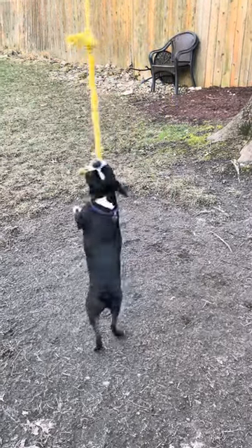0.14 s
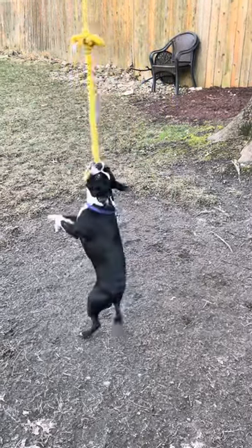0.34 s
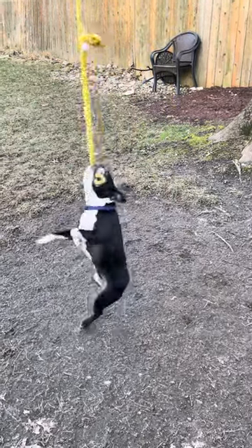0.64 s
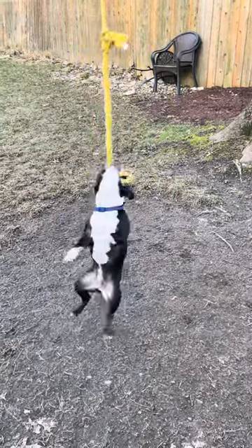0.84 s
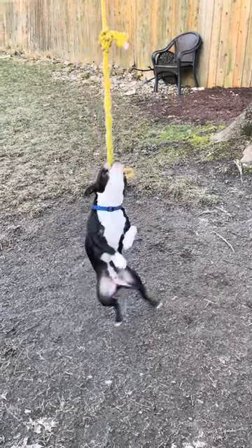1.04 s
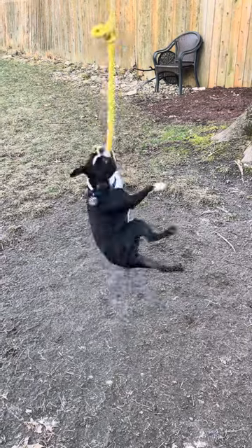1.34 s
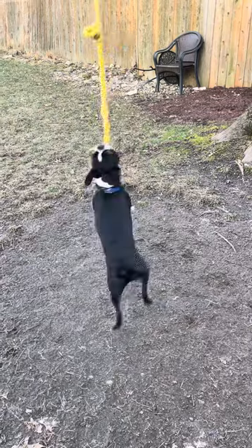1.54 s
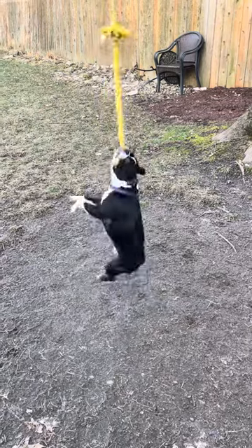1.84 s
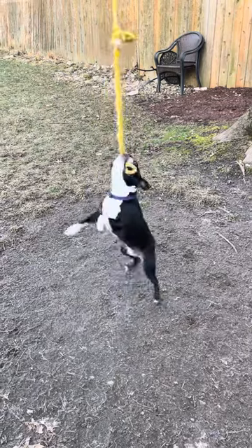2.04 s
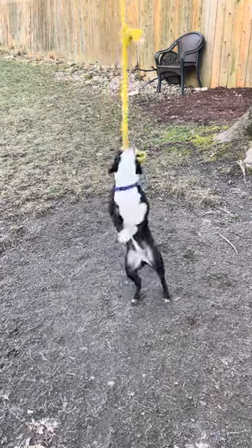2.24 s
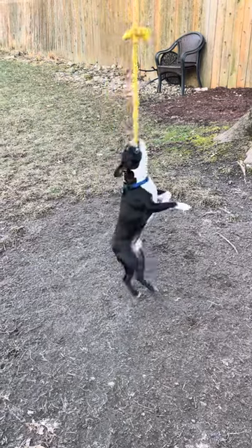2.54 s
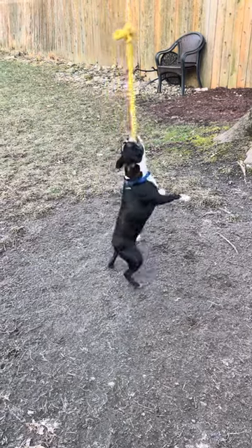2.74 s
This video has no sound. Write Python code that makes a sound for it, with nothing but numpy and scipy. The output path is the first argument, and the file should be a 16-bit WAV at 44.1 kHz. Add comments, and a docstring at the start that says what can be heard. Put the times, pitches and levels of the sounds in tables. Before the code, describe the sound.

A dog gripping a rope gives two throaty, raspy growls, with sharp jaw and rope snaps around the first's end, then a brief whine and faint dirt scuffs; quiet backyard, stereo microphone at moderate distance.

```python
"""In a quiet backyard a dog hangs from a rope and growls twice through its clenched teeth.
Each growl starts as a pitched tone and breaks into a rasp: regular and irregular beats filtered by a throat.
Both throb on a throat resonance, and the second clears into a whine of regular beats.
Jaws and rope snap and paws scuff the dirt, all shaped noise reaching two microphones with a faint echo.
A low, wavering sine hum and filtered noise lie under it all."""
import sys
import numpy as np
from scipy import signal
from scipy.fft import rfft, irfft, next_fast_len
from scipy.io import wavfile
from scipy.ndimage import uniform_filter1d, map_coordinates

SR = 44100
rng = np.random.default_rng(int(sys.argv[2]) if len(sys.argv) > 2 else 0)


def dump_mix(stems):
    """Bounce the given channels to the path in sys.argv[1] as a 16-bit WAV at rate SR."""
    frames = np.atleast_2d(stems).T  # one column per channel
    limited = np.clip(frames, -1, 1)  # hard clip at full scale
    pcm = np.round(limited * 32767).astype(np.int16)
    wavfile.write(sys.argv[1], SR, pcm)


N = 127890  # samples, 2.9 s

# hollow colour of jaw knocks and of the body of a scuff: hz [Hz], level_db [dB, relative]
KNOCK_COLOUR = [(150, -9.5), (650, -4), (1400, 2), (2000, 0), (2500, -16.5), (5000, -53)]
# bright colour of cracks and of dirt grit: hz [Hz], level_db [dB, relative]
CRACK_COLOUR = [(1500, -25), (3200, 6), (7000, -1.5), (9000, 8.5), (10800, 4.5), (15500, -54.5)]


def amp(db):
    """Decibels to gain."""
    return 10 ** (np.asarray(db) / 20)


def unit(x):
    """Scale to rms 1."""
    return x / np.sqrt(np.mean(x ** 2) + 1e-20)


def steady(x, size=900):
    """Hold the short-term rms near 1, judged over windows of size samples."""
    power = uniform_filter1d(uniform_filter1d(x * x, size), size)
    return x / np.sqrt(np.abs(power) + 1e-14)


def along(points, hz):
    """Read (Hz, value) points on a log frequency axis."""
    f, v = np.transpose(points)
    return np.interp(np.log(hz + 1), np.log(f + 1), v)


def curves(rows):
    """One value per sample for each column after the time."""
    s, *cols = np.transpose(rows)
    return [np.interp(np.arange(N) / SR, s, c) for c in cols]


def gate(rows, fade_s=0.0069):
    """Fully open from the first row to the last, with a short fade outside each end."""
    t = np.arange(N) / SR
    inside_s = np.minimum(t - rows[0][0], rows[-1][0] - t)
    return np.clip(inside_s / fade_s + 1, 0, 1)


def wobble(rate):
    """A smooth random curve, rate knots a second."""
    knots = rng.standard_normal(int(N * rate / SR) + 4)
    return map_coordinates(knots, [np.arange(N) * rate / SR])


def filtered(x, response):
    """Multiply the spectrum of x by a response of frequency."""
    m = 2 * next_fast_len(N)
    return irfft(rfft(x, m) * response(np.fft.rfftfreq(m, 1 / SR)), m)[..., :N]


def coloured(x, points, band=lambda hz: 1):
    """Causal (minimum-phase) filter with the given (Hz, dB) shape, within a band."""
    def response(hz):
        size = np.maximum(amp(along(points, hz)) * band(hz), 1e-6)
        cepstrum = irfft(np.log(size))
        # folding the cepstrum forward in time makes the filter causal
        half = len(cepstrum) // 2
        cepstrum[1:half] *= 2
        cepstrum[half + 1:] = 0
        return np.exp(rfft(cepstrum))
    return filtered(x, response)


def gliding(x, scale, points, band):
    """Filter in warped time, so that resonances and band edges move in proportion to scale."""
    clock, n = np.cumsum(scale), np.arange(N)
    warped = map_coordinates(x, [np.interp(n, clock, n)])
    return map_coordinates(coloured(warped, points, band), [clock])


def beats(hz):
    """Sample positions at which a cycle completes."""
    turns = np.cumsum(hz) / SR
    return np.interp(np.arange(1, int(turns[-1])), turns, np.arange(N))


def pulses(at, scatter_db, order=8):
    """Band-limited clicks of random size at fractional sample positions."""
    k = at.astype(int)[:, None] + np.arange(1 - order, order + 1)
    d = k - at[:, None]
    size = amp(scatter_db * np.clip(rng.standard_normal((len(at), 1)), -2, 2))
    clicks = size * np.sinc(d) * np.sinc(d / order)  # windowed sinc
    return np.bincount(np.clip(k, 0, N - 1).ravel(), clicks.ravel(), N)


def growl(effort, bright, throat, low_hz=1300, high_hz=4300):
    """Regular and irregular beats of the folds share one throat; the muzzle resonances rise as the lips part."""
    level_db, = curves(effort)
    mids_db, treble_db = curves(bright)
    age_s = np.maximum(np.arange(N) / SR - effort[0][0], 0)
    pitch_hz, rough = folds(age_s)
    source = fold_source(pitch_hz, rough)

    def below(hz, edge_hz):
        """Pass what lies under an edge."""
        return 1 / (1 + (hz / edge_hz) ** 12)

    low = steady(coloured(source, throat, lambda hz: below(hz, low_hz)), size=600)
    sag, open_s = 0.32, 0.18  # the middle band starts this share low and rises over this time
    muzzle = 1 - sag * np.clip(1 - age_s / open_s, 0, 1)
    mid = steady(gliding(source, muzzle, throat, lambda hz: (1 - below(hz, low_hz)) * below(hz, high_hz)))
    spit_db = 3.5  # extra size spread of the treble when the voice is rough
    spitting = source * amp(spit_db * rough * wobble(410))
    top = steady(coloured(spitting, throat, lambda hz: 1 - below(hz, high_hz)), size=2200)

    tone, hold = throbs()
    flutter_db, duck_db = 2.92, -4  # greatest tremor of the rough voice; dip of the low band under a throb
    tremor = amp(flutter_db * rough * np.tanh(wobble(70)))
    lower = amp(level_db + duck_db * hold) * low
    upper = gate(bright) * (amp(mids_db) * mid + amp(treble_db) * top)
    return gate(effort) * (tone + tremor * (lower + upper))


def folds(age_s):
    """Pitch, and the share of rasp, which drops away while the folds beat regularly."""
    # spells of regular beating: start_s [s], end_s [s], first_pitch_hz [Hz], last_pitch_hz [Hz]
    spells = [(0.211, 0.246, 321.4, 413.4), (0.262, 0.292, 406, 434.2), (0.298, 0.328, 444.3, 474),
              (0.343, 0.375, 441, 463), (1.021, 1.045, 434, 461.4), (1.079, 1.106, 472.7, 507.7),
              (1.723, 1.751, 278.6, 405.4), (1.754, 1.785, 414.5, 475.4), (1.797, 1.82, 411, 451),
              (1.847, 1.869, 412.6, 440)]
    switch_s = 0.0062  # time to change between regular and irregular beating
    fray = 0.1  # rasp share added one second into a growl, growing with age squared
    pitch_hz, = curves([point for a, b, first, last in spells for point in ((a, first), (b, last))])
    t = np.arange(N) / SR
    regular = sum(np.clip(np.minimum(t - a, b - t) / switch_s + .5, 0, 1) for a, b, *_ in spells)
    return pitch_hz, np.clip(1 - regular + fray * age_s ** 2, 0, 1)


def fold_source(pitch_hz, rough):
    """Even clicks of regular folds cross over to a rasp of scattered clicks and rushing air."""
    fold_jitter, rasp_jitter = 0.01515, .16  # spread of the beat rate, natural log
    rasp_hz, scatter_db = 314.7, 4.5  # central rate and size spread of the irregular beats
    air = 0.42  # share of the rasp's power that is rushing air
    clean = pulses(beats(pitch_hz * np.exp(fold_jitter * wobble(200))), 0)
    tearing = steady(pulses(beats(rasp_hz * np.exp(rasp_jitter * wobble(330))), scatter_db))
    rasp = np.sqrt(1 - air) * tearing + np.sqrt(air) * rng.standard_normal(N)
    return np.sqrt(1 - rough) * unit(clean) + np.sqrt(rough) * rasp


def throbs(waver=0.02544):
    """The folds lock onto the throat's resonance in short swells: the tone, and how firmly it holds (0-1)."""
    # swells of the locked voice: centre_s [s], length_s [s], pitch_hz [Hz], level_db [dB]
    swell_rows = [(.547, 0.023, 625, -18), (.586, 0.029, 592.4, -19.5), (0.619, 0.027, 673, -20),
                  (0.664, 0.05, 632.3, -19), (.713, 0.037, 614.5, -20), (0.791, 0.012, 575.6, -23),
                  (0.845, .024, 626, -23.5), (1.05, 0.011, 580, -22.5), (1.071, 0.0087, 577.7, -21),
                  (1.113, 0.0054, 582.8, -25), (1.836, 0.0098, 595.4, -26.5), (1.879, 0.028, 579, -30),
                  (1.926, 0.035, 621, -27)]
    beat, octave_db = 0.15, -18.5  # depth of a pattern repeating every third cycle; overtone level
    t = np.arange(N) / SR
    swells = [np.exp(-(2 * (t - s) / length) ** 4) for s, length, _, _ in swell_rows]
    _, hz, _ = curves(swell_rows)
    phase = 2 * np.pi * np.cumsum(hz * (1 + waver * wobble(200))) / SR
    pulsing = 1 + beat * (np.cos(phase / 3) + np.sin(2 * phase / 3))
    tone = unit(np.sin(phase) * pulsing + amp(octave_db) * np.sin(2 * phase))
    loudness = sum(amp(row[-1]) * swell for row, swell in zip(swell_rows, swells))
    return tone * loudness, np.minimum(sum(swells), 1)


def whine(jitter=0.0017):
    """The folds settle into a clean note that rises, then drops as it fades."""
    # course of the whine: time_s [s], pitch_hz [Hz], level_db [dB]
    course = [(2.462, 389, -35.5), (2.508, 400, -25.5), (2.58, 410.4, -28), (2.637, 457.3, -32),
              (2.656, 430, -35), (2.675, 379, -60)]
    # throat and muzzle during the whine: hz [Hz], level_db [dB, relative]
    whine_throat = [(150, -40), (400, 1.5), (810, -1.5), (900, -19.5), (1200, -29.5), (1360, -12.5),
                    (1600, -26), (1800, -5.5), (2030, -6.5), (2200, -29), (3100, -19), (3700, -37),
                    (4300, -23.5), (4850, -45), (5200, -23), (6200, -24), (8800, -46), (10200, -23.5),
                    (11500, -66.5)]
    pitch_hz, level_db = curves(course)
    source = pulses(beats(pitch_hz * np.exp(jitter * wobble(150))), 0)
    return gate(course) * amp(level_db) * steady(coloured(source, whine_throat))


def snaps(attack_s=0.00081, tail_db=-16, tail_t60_s=0.23):
    """Jaws and rope snap: each a hollow noise knock with a short tail and a bright noise crack."""
    # the snaps: start_s [s], knock_db [dB], crack_db [dB], t60_s [s to fall by 60 dB]
    snap_rows = [(.232, -49, -30, 0.031), (0.828, -26, -42, .07), (1.118, -25, -42, 0.074),
                 (1.133, -57, -24, 0.034), (1.238, -34, -41.5, 0.042), (1.259, -37.5, -32.5, 0.036),
                 (1.719, -68, -36, 0.05)]
    knock, crack = np.zeros((2, N))
    for s, knock_db, crack_db, t60_s in snap_rows:
        t = np.maximum(np.arange(N) / SR - s, 0)
        rise = 1 - np.exp(-t / attack_s)
        shape = rise * amp(-60 * t / t60_s)
        tail = rise * amp(tail_db - 60 * t / tail_t60_s)
        knock += amp(knock_db) * (shape + tail)
        crack += amp(crack_db) * shape
    hollow = unit(coloured(rng.standard_normal(N), KNOCK_COLOUR))
    bright = unit(coloured(rng.standard_normal(N), CRACK_COLOUR))
    return knock * hollow + crack * bright


def scuffs(grain_db=5):
    """Paws drag over gritty soil in short, grainy swells of noise."""
    # the scuffs: centre_s [s], length_s [s], body_db [dB], grit_db [dB]
    scuff_rows = [(0.202, 0.049, -77, -48), (1.321, 0.24, -51, -57), (1.453, 0.046, -52, -59),
                  (1.625, 0.014, -60, -49), (1.697, 0.044, -60.5, -49), (2.778, 0.18, -55, -60.5)]
    body, grit = np.zeros((2, N))
    for s, length_s, body_db, grit_db in scuff_rows:
        shape = np.exp(-(2 * (np.arange(N) / SR - s) / length_s) ** 2)
        body += amp(body_db) * shape
        grit += amp(grit_db) * shape
    grains = amp(grain_db * wobble(350)) * rng.standard_normal((2, N))
    dull = unit(coloured(grains[0], KNOCK_COLOUR))
    gritty = unit(coloured(grains[1], CRACK_COLOUR))
    return body * dull + grit * gritty


def placed(x):
    """The dog's sound differs in level and phase between the microphones; the ground answers faintly."""
    # level difference between the microphones: hz [Hz], left_minus_right_db [dB]
    lean = [(200, 1), (620, -3), (1110, -7.5), (2000, 0.5), (3500, 0)]
    # phase difference between the microphones: hz [Hz], left_lead_rad [radians]
    lead = [(200, 0.066), (1000, 0.76), (2000, 0.27), (4000, 2.16), (7200, 1.095), (11000, 4.89)]
    echo_db, echo_t60_s = -18, .08
    sides = np.array([[.5], [-.5]])  # each microphone takes half of the difference
    direct = filtered(x, lambda hz: amp(sides * along(lean, hz)) * np.exp(1j * sides * along(lead, hz)))
    t = np.arange(SR // 3) / SR
    decaying = rng.standard_normal((2, len(t))) * amp(-60 * t / echo_t60_s)
    tails = np.array([n / np.linalg.norm(n) for n in decaying])
    return direct + amp(echo_db) * signal.fftconvolve(x[None], tails, axes=1)[:, :N]


def yard(side_db=-7, mono_below_hz=250, hum_waver_db=3):
    """Outdoor air as noise, nearly mono in the bass, with a low hum that wavers in pitch and level."""
    # colour of the quiet yard: hz [Hz], density_db [dB per Hz, relative]
    air_colour = [(18, -24.5), (50, 0), (130, -2), (300, -17.5), (1000, -15.5), (3000, -34.5),
                  (4800, -40.5), (6800, -34), (9000, -59), (10300, -31.5), (12000, -79)]
    air_db, hum_hz, hum_db = -47.5, 79.3, -52.5
    mid, side = [unit(coloured(n, air_colour)) for n in rng.standard_normal((2, N))]
    side = amp(side_db) * filtered(side, lambda hz: hz / (hz + mono_below_hz))
    hum_phase = 2 * np.pi * np.cumsum(hum_hz + 3 * wobble(16)) / SR
    hum = unit(np.sin(hum_phase) * amp(hum_waver_db * wobble(21.8)))
    return amp(air_db) * np.array([mid + side, mid - side]) + amp(hum_db) * hum


def scene():
    """Two growls, the whine, snaps and scuffs in the yard."""
    # effort of each growl, the level of its low band: time_s [s], level_db [dB]
    effort_1 = [(.222, -34), (.27, -28.5), (.325, -25.5), (.5, -25), (.6, -25.5), (.93, -27.5), (1.12, -28),
                (1.15, -36)]
    effort_2 = [(1.728, -42.5), (1.75, -31), (1.86, -31), (1.94, -28.5), (2.03, -30), (2.16, -29),
                (2.465, -32)]
    # upper bands of each growl: time_s [s], upper_mids_db [dB], treble_db [dB]
    bright_1 = [(0.243, -43.5, -46.5), (0.482, -45.5, -50), (0.661, -39, -57), (0.902, -41, -57),
                (1.0, -35, -57.5), (1.125, -32.5, -42)]
    bright_2 = [(1.76, -45, -58.5), (1.84, -51, -63), (1.931, -42.5, -58.5), (2.021, -51, -58.5),
                (2.36, -41, -50.5), (2.46, -51, -59)]
    # throat and muzzle of each growl: hz [Hz], level_db [dB, relative]
    throat_1 = [(110, -61.5), (250, -7), (410, -6), (580, 4.5), (770, -9.5), (930, 2), (1120, -15.5),
                (1680, -11.5), (1880, -7), (2330, -29.5), (2850, -21.5), (3600, -31), (7000, -26),
                (9000, -33.5), (10500, -31.5), (13000, -67)]
    throat_2 = [(110, -24.5), (330, -0.5), (490, 2.5), (600, 3), (780, -7), (1000, 1), (1160, -14),
                (1620, -10), (1980, -6), (2400, -26.5), (3150, -18), (4900, -26.5), (6400, -14),
                (9000, -41), (10300, -21.5), (12000, -71.5)]
    first = growl(effort_1, bright_1, throat_1)
    second = growl(effort_2, bright_2, throat_2)
    return placed(first + second + whine() + snaps() + scuffs()) + yard()


def record(dry):
    """Nothing is kept above the band limit of 15.7 kHz."""
    return filtered(dry, lambda hz: hz < 15700)


dry = scene()
out = record(dry)
dump_mix(out)
```